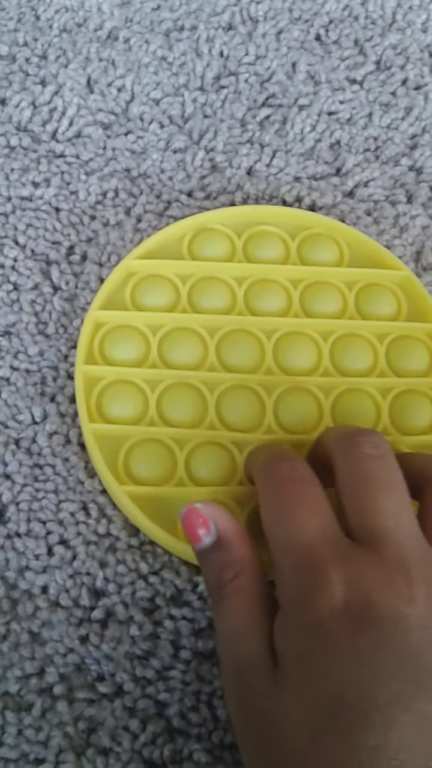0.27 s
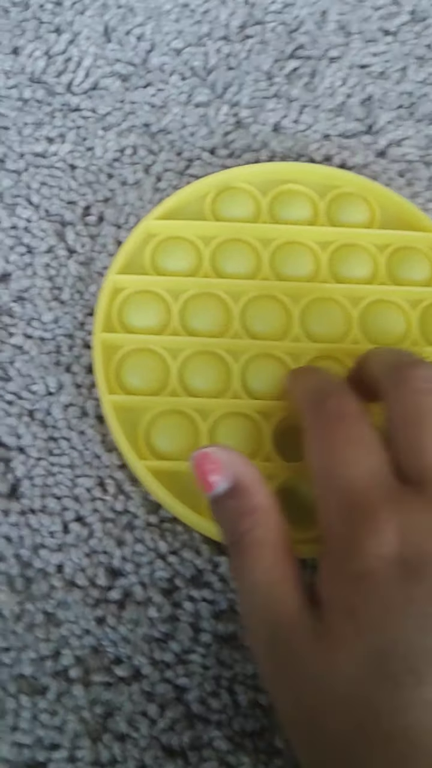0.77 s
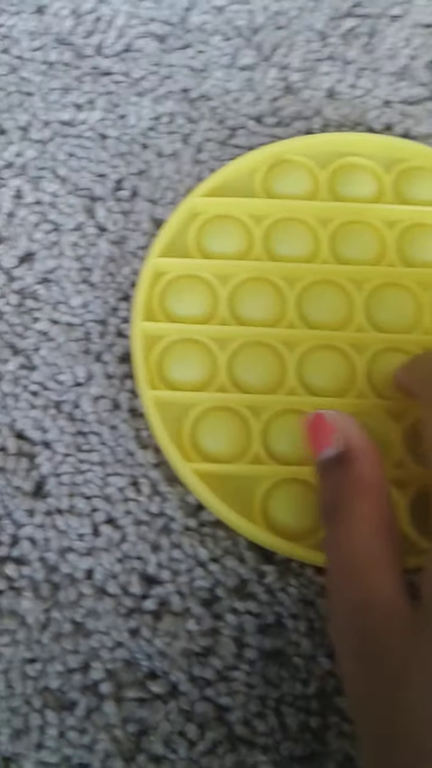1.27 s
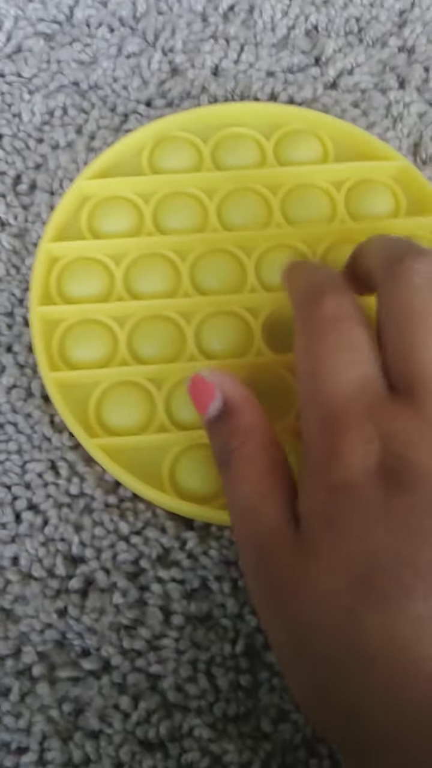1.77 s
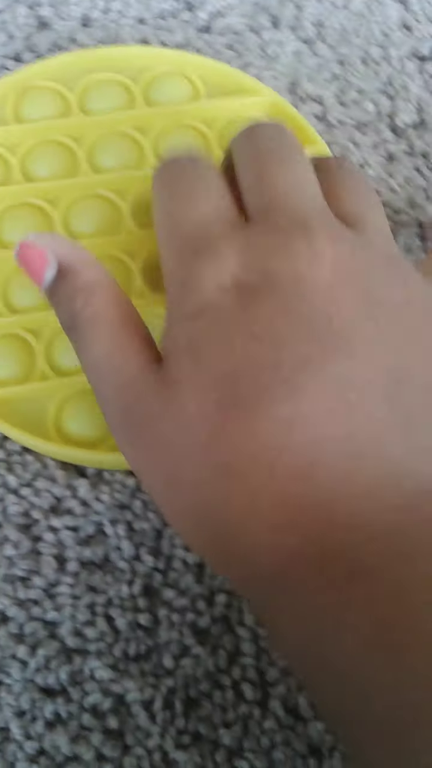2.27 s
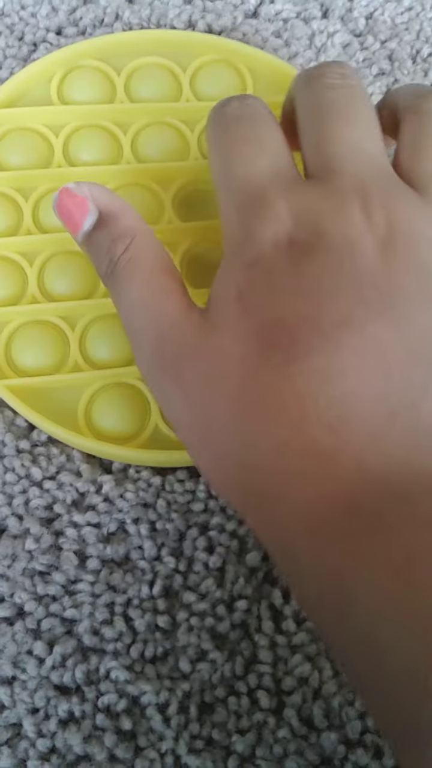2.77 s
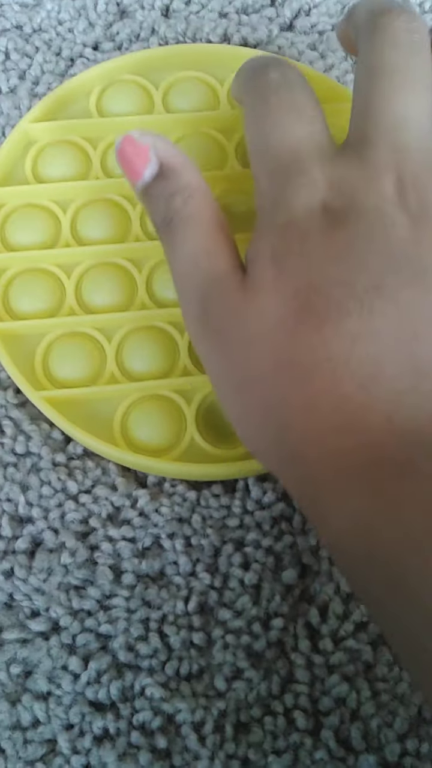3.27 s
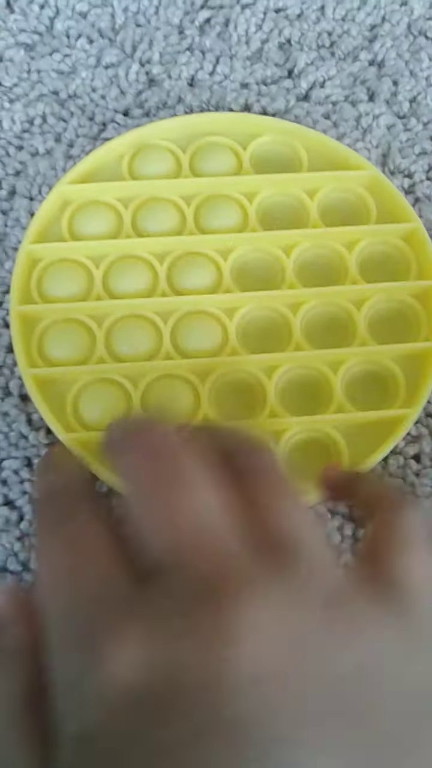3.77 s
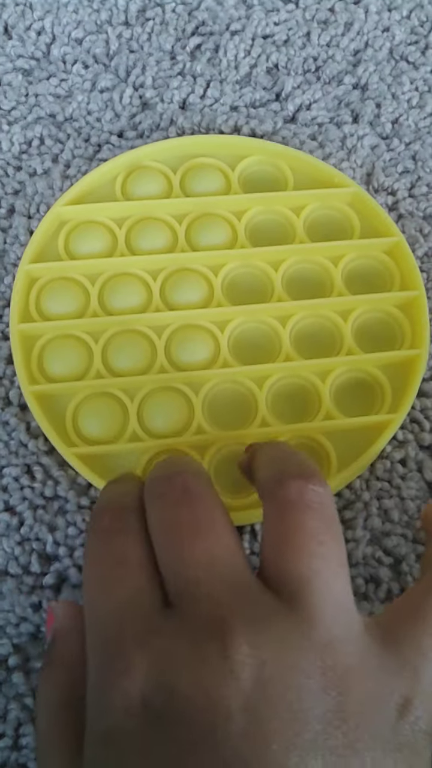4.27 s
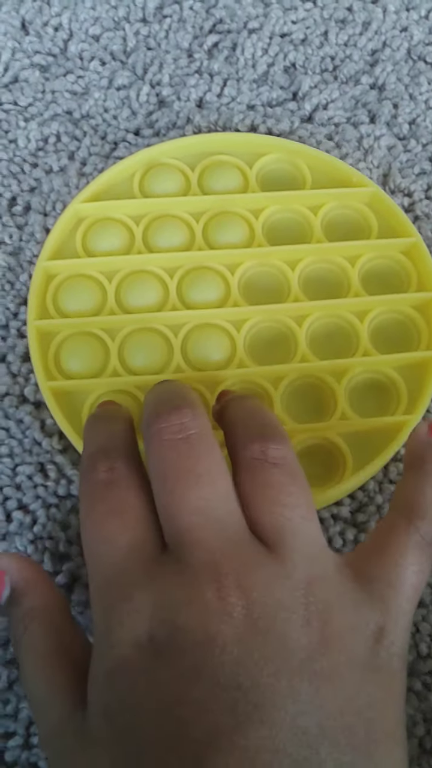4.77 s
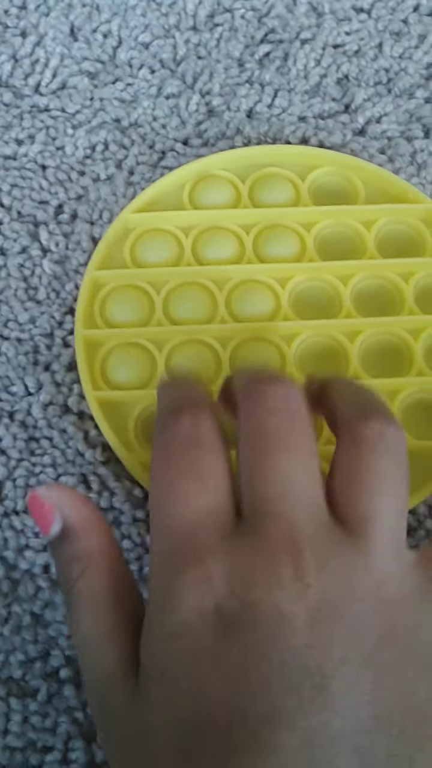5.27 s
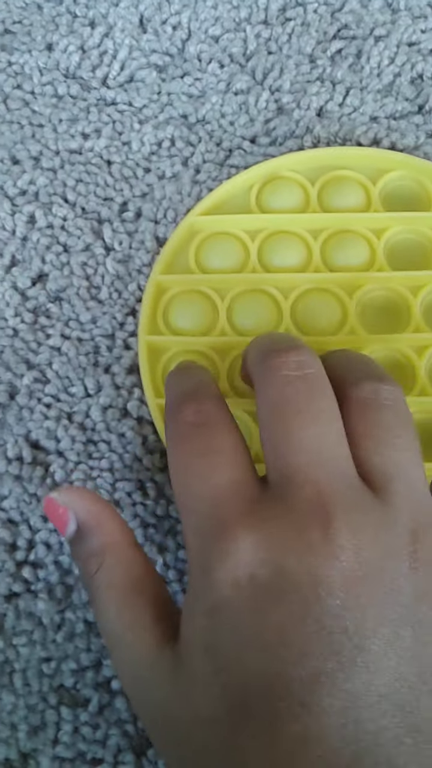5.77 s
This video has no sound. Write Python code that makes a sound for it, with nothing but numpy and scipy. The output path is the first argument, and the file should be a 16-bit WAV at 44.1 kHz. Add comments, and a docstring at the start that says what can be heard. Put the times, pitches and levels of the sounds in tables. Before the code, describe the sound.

Fingers press silicone toy bubbles one at a time, each buckling with a crisp dull snap in a quiet room with a faint low hum.

```python
"""Fingers press in the bubbles of a silicone pop-it toy lying on a carpet, close to a phone.
Room air and a faint wavering hum run throughout; a low rumble throbs over the first two seconds.
Skin soon ticks (short noise bursts) and rubs (swelling noise bands) on the silicone. Seven domes then
buckle in quick snaps, built from decaying modes, and a small room answers with a noise tail.
Past the middle the hand sweeps once over the carpet, as grainy noise; faint whines follow it."""
import sys
import numpy as np
from scipy import signal
from scipy.fft import rfft, irfft
from scipy.io import wavfile
from scipy.ndimage import uniform_filter1d

SR = 44100
rng = np.random.default_rng(int(sys.argv[2]) if len(sys.argv) > 2 else 0)


def transcribe(u):
    """Save the signal u as a 16-bit wav file named by the first command-line argument.

    u: samples, shape (n,) or (channels, n), limited to [-1, 1]; the rate is SR.
    q: integer samples, one column per channel.
    """
    v = np.clip(np.atleast_2d(u).T, -1, 1)
    q = np.round(v * 32767).astype(np.int16)
    wavfile.write(sys.argv[1], SR, q)


N = 265923
T = np.arange(N) / SR

# spectrum of the room air: (frequency [Hz], level [dB])
AIR_COLOUR = [(30, -11.5), (55, -2.5), (85, 1), (120, 0.5), (200, -5.5), (290, -8.5), (420, -13.5),
              (570, -9), (820, -20.5), (1500, -24.5), (3000, -33.5), (4600, -45), (6300, -39), (10000, -41),
              (16000, -41)]
# hum lines: (frequency [Hz], mean level [dB])
HUM_LINES = [(118.4, -69), (522, -83.5), (554.5, -79)]
# level of the low throb over time: (time [s], level [dB])
RUMBLE_LEVEL = [(0.0, -58), (0.082, -52), (0.52, -49), (0.55, -41), (0.622, -52.5), (0.778, -44.5),
                (0.828, -51.5), (1.102, -44), (1.118, -51), (1.354, -56), (1.606, -49), (1.824, -68),
                (1.85, -81)]
# spectrum of the rumble around the throbbing tone: (frequency [Hz], level [dB])
RUMBLE_COLOUR = [(50, -17.5), (85, -9.5), (105, -0.5), (120, 0), (145, 0.5), (170, -8.5), (220, -16),
                 (550, -20), (1000, -29), (3500, -44.5), (4600, -55.5), (14000, -47)]
# skin letting go of the silicone between presses: (time [s], level [dB], pitch [Hz])
TICKS = [(.127, -56, 7800), (.476, -49.5, 6500), (.7245, -56, 7300), (.8387, -49, 7950),
         (1.235, -62.5, 7400), (1.819, -60.5, 7500), (1.967, -53.5, 6900), (4.8965, -57, 7600),
         (5.2287, -57, 7700)]
# the faint broad hiss of skin on silicone: (frequency [Hz], level [dB])
HISS_COLOUR = [(1500, -20.5), (3000, -0.5), (3600, -9.5), (4500, -12.5), (5600, -1.5), (8500, 5),
               (10800, -0.5), (14000, -3), (16000, -7.5)]
# fingers sliding on to the next dome: (middle [s], half length [s], level [dB], pitch [Hz])
SLIDES = [(.145, .11, -68, 6800), (.68, .04, -73, 7200), (.82, .09, -68, 6600), (1.04, .12, -64.5, 7350),
          (2.025, 0.061, -65.5, 7200), (2.11, .06, -70, 6460), (2.702, 0.055, -83.5, 7430),
          (4.137, 0.072, -80, 6200), (4.97, 0.073, -86, 6500), (5.252, 0.027, -77.5, 7500),
          (6.001, 0.062, -83.5, 6730)]
# one dome each, pushed in by a fingertip: (middle [s], dome pitch [Hz], rim pitch [Hz],
# ring length [factor], room send [dB], rub level [dB], tick against its snap [dB], rub and tick pitch [Hz])
PRESSES = [(0.42, 1055, 2720, .98, 5.8, -76.5, -29, 5500), (1.565, 1132, 2150, 1.03, 3.5, -72.5, -42, 6550),
           (2.21, 1120, 2480, 0.97, 1.5, -65.5, -40, 6400), (2.925, 1170, 2520, 1.1, 3, -74.5, -45, 6630),
           (3.43, 1270, 2600, .78, -1.2, -77, -48, 6550), (4.46, 890, 2200, 0.7, 7, -90.5, -43, 6400),
           (5.125, 1074, 2850, .85, 5.5, -78.5, -31, 5850)]
# the steps in which the domes buckle:
# (time [s], level [dB], hollow under the dome [dB], rim [dB], bright crack [dB])
SNAPS = [(.3389, -36, 12.5, 2, -5), (.3431, -18.5, 3, 3, 3), (.3486, -22.5, 1.5, 1, -1),
         (.3559, -23, 7, 3, 4.5), (1.5184, -34.5, 10, -28, -3), (1.5282, -31, 13, -9, -6),
         (1.5386, -18, 5.5, -4.5, 0), (1.5412, -10.3, -1, -7, 5), (1.559, -12.5, -5, 1.5, 12),
         (2.1851, -36, 7, 3, 5), (2.1931, -14.3, -3, 1, 10), (2.2008, -13, 0.5, -2, 3.5),
         (2.219, -11, -3, 1, 3.5), (2.9246, -18.5, 2, -5, 1), (2.9372, -13.5, 6, 7, -1.5),
         (3.452, -39.5, 16.5, -8, -9), (3.473, -21.5, 7, 6.5, 4), (4.432, -43, 15, -21, -10),
         (4.4697, -18.3, -4.5, 0, -2), (5.1018, -20.5, 3.5, -4.5, 0), (5.1075, -26, 6.5, 2.5, -1)]
# modes of a reference dome, the hollow, the dome itself, then its rim:
# (frequency [Hz], level [dB], ring time [s]); each press retunes most and rescales the ring times
DOME_MODES = [(496, -10.5, 0.0021), (1094, -1, 0.0022), (1710, -16.3, 0.0012), (2400, -16, 0.0019),
              (2916, -25.5, .0013), (3670, -32, .0012), (6090, -44, 0.002)]
# colour of the snaps: the small toy gives little bass, and a deep dip sits near 4.6-5.3 kHz: (frequency [Hz],
# gain [dB])
POP_COLOUR = [(50, -28.5), (200, -14.5), (320, -3), (420, -0.5), (3700, -1.5), (4250, -7), (4700, -11),
              (5300, -15), (6000, -5.5), (8500, -6), (11000, -12), (16000, -20.5)]
# spectrum of the room's diffuse tail: (frequency [Hz], level [dB])
ROOM_COLOUR = [(150, 20.5), (400, -6.5), (700, 1.5), (1100, -6.5), (1800, 5.5), (2600, -7.5), (4000, 1.5),
               (6300, -1), (12000, -2)]
# spectrum of the hand brushing the carpet: (frequency [Hz], level [dB])
SWEEP_COLOUR = [(150, 6), (270, 1), (400, -1.5), (1000, -3.5), (2300, -7), (3500, -19), (4600, -19),
                (5200, -14.5), (5700, -6), (6400, -1), (7600, -9.5), (10000, -21), (16000, -32)]
# faint brief whines and swells in the room:
# (middle [s], half length [s], level [dB], pitch [Hz], width [octaves])
WHINES = [(3.807, 0.11, -60, 267.6, 0.085), (3.96, 0.025, -64, 702, 0.11), (5.32, .02, -65, 614, .08),
          (5.42, 0.048, -64.5, 960, 0.075), (5.54, 0.07, -71, 940, 0.11), (5.468, 0.12, -76, 1570, 0.74),
          (5.89, 0.16, -71, 1220, 0.63)]

AIR_DB = -61.3  # mean level of the room air
PRESS_HALF_S = .085  # half the time a fingertip rubs on the dome it pushes
# tacky skin sticks and jumps now and then while it rubs; JUMP_DB is the largest added gain
JUMPS_PER_S, JUMP_DB, JUMP_DECAY_S = 10, 2, .002
# pitches to which DOME_MODES is tuned, and the high rim mode that carries the crack
DOME_HZ, RIM_HZ, CRACK_MODE = 1120, 2400, 5
# a snap weaker than a full one finds the dome slack and rings lower
FULL_SNAP_DB, SLACK_OCTAVES_PER_DB, SLACK_MOST_OCTAVES = -23.5, 0.1, .35
# the hand on the carpet: time of contact, level midway, drop towards its ends, fade outside it
SWEEP_START_S, SWEEP_END_S, SWEEP_DB, SWEEP_ARCH_DB, SWEEP_EDGE_DB_PER_S = 3.646, 3.868, -52.5, 7, 332
CUT_HZ = 15750  # top of the phone's range


def undb(db):
    """Decibels to gain."""
    return 10 ** (np.asarray(db) / 20)


def unit(x):
    """Scale to rms 1."""
    return x / np.sqrt(np.mean(x ** 2))


def colour(x, points):
    """Filter by a (frequency [Hz], gain [dB]) curve, drawn straight over log frequency."""
    hz, db = np.transpose(points)
    f = np.maximum(np.arange(len(x) // 2 + 1) * SR / len(x), 1)
    gain = undb(np.interp(np.log(f), np.log(hz), db))
    return irfft(rfft(x) * gain, len(x))


def noise(points, length=N):
    """Coloured noise of rms 1."""
    return unit(colour(rng.standard_normal(length), points))


def band(hz, octaves):
    """A bell-shaped spectrum around one pitch, as (frequency [Hz], level [dB]) points."""
    steps = np.arange(-6, 7) / 2
    return np.c_[hz * 2 ** (steps * octaves), 20 * np.log10(np.exp(-steps ** 2))]


def walk(rate):
    """Slow random wander of rms 1, with about `rate` new values a second."""
    k = int(SR / rate)
    held = np.repeat(rng.standard_normal(N // k + 1), k)
    smooth = uniform_filter1d(uniform_filter1d(held, k), k)
    return unit(smooth[:N])


def wavering(hz, drift_hz):
    """A tone of rms 1 whose pitch wanders."""
    phase = 2 * np.pi * np.cumsum(hz + drift_hz * walk(14)) / SR
    return np.sqrt(2) * np.sin(phase)


def add(track, start, sound):
    """Mix a sound into a track from a start time."""
    i = max(int(start * SR), 0)
    track[i:i + len(sound)] += sound[:N - i]


def swish(middle_s, half_s, points, squareness=2):
    """Start time and sound of swelling noise; a squarer one starts and stops more abruptly."""
    t = np.arange(SR) / SR + max(middle_s - .5, 0)
    envelope = np.exp(-np.abs((t - middle_s) / half_s) ** squareness)
    return t[0], noise(points, SR) * envelope


def press_at(s):
    """The press that a snap belongs to: the nearest in time."""
    return min(PRESSES, key=lambda press: abs(press[0] - s))


def room(x, t60_s=0.32, build_s=0.0073, tail_db=-11, ceiling_db=-20):
    """The carpet swallows the first bounce; the ceiling answers dully, then a short diffuse tail."""
    t = np.arange(SR * 3 // 5) / SR
    decay = undb(-60 * t / t60_s)
    build_up = 1 - np.exp(-(t / build_s) ** 2)
    tail = noise(ROOM_COLOUR, len(t)) * decay * build_up
    tail = tail / np.sqrt(np.sum(tail ** 2))
    ceiling = np.exp(-((t - .0133) / .00012) ** 2)  # a rounded echo after 13.3 ms
    ceiling = ceiling / ceiling.sum()
    response = undb(tail_db) * tail + undb(ceiling_db) * ceiling
    return signal.fftconvolve(x, response)[:N]


def air():
    """Room air: coloured noise whose level wanders slightly."""
    wander_db = .8 * walk(5)
    return noise(AIR_COLOUR) * undb(AIR_DB + wander_db)


def hum(waver_db=2.5):
    """A faint hum: a few tones that waver in pitch and level."""
    out = np.zeros(N)
    for hz, db in HUM_LINES:
        out += undb(db + waver_db * walk(5.8)) * wavering(hz, drift_hz=1.517)
    return out


def throb(tone_db=-2, rumble_db=-4, flutter_db=2.2):
    """An unsteady low tone in rumble that flutters and dies away early."""
    s, db = np.transpose(RUMBLE_LEVEL)
    sounding = (T >= s[0] - .05) & (T <= s[-1] + .05)
    level = undb(np.interp(T, s, db)) * sounding
    flutter = undb(flutter_db * walk(21.96))
    tone = undb(tone_db) * wavering(hz=114, drift_hz=7)
    rumble = undb(rumble_db) * noise(RUMBLE_COLOUR)
    return level * flutter * (tone + rumble)


def ticks(splash_db=-13, width_octaves=.25, decay_s=.0018):
    """Tacky skin peels off the silicone with tiny bright ticks: decaying noise bursts."""
    out = np.zeros(N)
    t = np.arange(SR // 50) / SR
    peels = list(TICKS)
    for s, db, *_ in SNAPS:  # every snap also jerks the skin loose
        *_, tick_db, hz = press_at(s)
        peels.append((s, db + tick_db, hz))
    for s, db, hz in peels:
        chance = rng.standard_normal(len(t))
        pitched = unit(colour(chance, band(hz, width_octaves)))
        splash = undb(splash_db) * unit(colour(chance, HISS_COLOUR))
        add(out, s, undb(db) * (pitched + splash) * np.exp(-t / decay_s))
    return out + room(out)


def jumps():
    """Gain of the rubbing: steady, with brief random spikes where the skin jumps."""
    starts = (rng.random(N) < JUMPS_PER_S / SR) * rng.random(N)
    spikes = signal.lfilter([1], [1, -np.exp(-1 / (JUMP_DECAY_S * SR))], starts)
    return 1 + undb(JUMP_DB) * spikes


def rubbing(width_octaves=0.26, hiss_db=-8, catch_db=1.9, pressure_db=1.2, squareness=2.6):
    """Fingers slide and catch on the silicone: pitched noise and hiss under an uneven grip."""
    rub = np.zeros(N)
    pushes = [(s, PRESS_HALF_S, rub_db, hz) for s, *_, rub_db, _, hz in PRESSES]
    for s, half_s, db, hz in list(SLIDES) + pushes:
        start, tone = swish(s, half_s, band(hz, width_octaves), squareness)
        _, hiss = swish(s, half_s, HISS_COLOUR, squareness)
        add(rub, start, undb(db) * (tone + undb(hiss_db) * hiss))
    unevenness = undb(catch_db * walk(120) + pressure_db * walk(24))
    return rub * jumps() * unevenness


def snap(t, ring_hz, length, hollow_db, rim_db, rim_hz, crack_db,
         run_up_cycles=0.23, grip=1.57, hollow_follows=.4, scatter_s=0.00013):
    """One dome flips at t = 0: its motion runs away, then rings until the fingertip chokes it."""
    out = 0
    # each dome has its own pitch, which the hollow follows in part; the rim has another
    pitch, rim = ring_hz / DOME_HZ, rim_hz / RIM_HZ
    tuning = [pitch ** hollow_follows, pitch, 1, rim, rim, np.sqrt(rim), 1]
    trims_db = [hollow_db, 0] + [rim_db] * (len(DOME_MODES) - 2)
    trims_db[CRACK_MODE] += crack_db
    for k, (hz, db, ring_s) in enumerate(DOME_MODES):
        age = t
        if k > 1:  # the rim does not give way all at once
            age = t - scatter_s * rng.standard_normal()
        run_up = np.minimum(age, 0) * ring_hz / run_up_cycles
        if k > 1:
            run_up = -run_up ** 2  # soft silicone rounds its start
        choke = (np.maximum(age, 0) / (ring_s * length)) ** grip
        ringing = np.cos(2 * np.pi * hz * tuning[k] * age)
        out = out + undb(db + trims_db[k]) * np.exp(run_up - choke) * ringing
    return out


def pops():
    """The snaps, straight and by way of the room; those of one press share the tuning of its dome."""
    direct, room_send = np.zeros(N), np.zeros(N)
    t = np.arange(-SR // 400, SR // 80) / SR
    for s, db, hollow_db, rim_db, crack_db in SNAPS:
        _, dome_hz, rim_hz, length, room_db, *_ = press_at(s)
        slack = np.clip((FULL_SNAP_DB - db) * SLACK_OCTAVES_PER_DB, 0, SLACK_MOST_OCTAVES)
        ring_hz = dome_hz * 2 ** -slack
        sound = undb(db) * snap(t, ring_hz, length, hollow_db, rim_db, rim_hz, crack_db)
        add(direct, s + t[0], sound)
        add(room_send, s + t[0], undb(room_db) * sound)
    return colour(direct + room(room_send), POP_COLOUR)


def friction(points, grain_db):
    """Countless tiny slips of uneven size."""
    size_db = grain_db * np.minimum(rng.exponential(size=N), 6)
    slips = rng.standard_normal(N) * undb(size_db)
    return unit(colour(slips, points))


def carpet_sweep():
    """The hand brushes the carpet once: friction, loudest midway, fading fast outside the contact."""
    touching = np.clip(T, SWEEP_START_S, SWEEP_END_S)
    way = 2 * (touching - SWEEP_START_S) / (SWEEP_END_S - SWEEP_START_S) - 1  # -1 to 1
    edge_db = SWEEP_EDGE_DB_PER_S * np.abs(T - touching)
    level = undb(SWEEP_DB - SWEEP_ARCH_DB * way ** 2 - edge_db)
    return friction(SWEEP_COLOUR, grain_db=3) * level


def whines():
    """Faint whines and swells: noise bands that rise and fade."""
    out = np.zeros(N)
    for s, half_s, db, hz, octaves in WHINES:
        start, whine = swish(s, half_s, band(hz, octaves))
        add(out, start, undb(db) * whine)
    return out


def scene():
    """The toy and the hand in the room, as one channel."""
    background = air() + hum() + throb() + whines()
    toy_and_hand = ticks() + rubbing() + pops() + carpet_sweep()
    return (background + toy_and_hand)[None]


def record(dry):
    """The phone cuts the deepest bass and the top."""
    low_cut = signal.butter(4, 45, "high", fs=SR, output="sos")
    top_cut = signal.ellip(10, .2, 70, CUT_HZ, fs=SR, output="sos")
    return signal.sosfilt(top_cut, signal.sosfilt(low_cut, dry))


dry = scene()
out = record(dry)
transcribe(out)
```